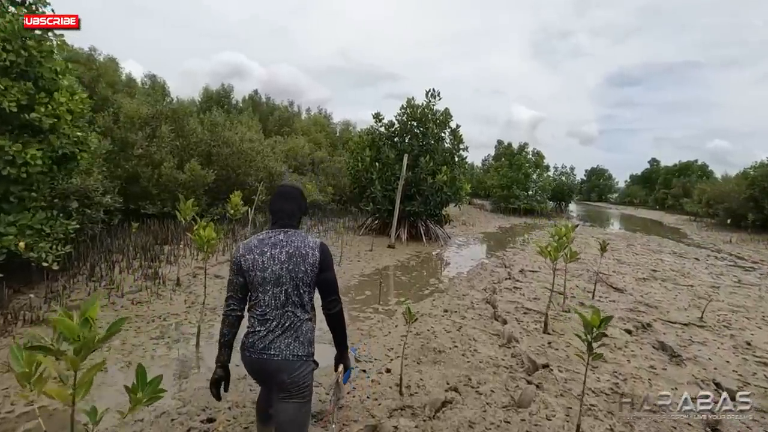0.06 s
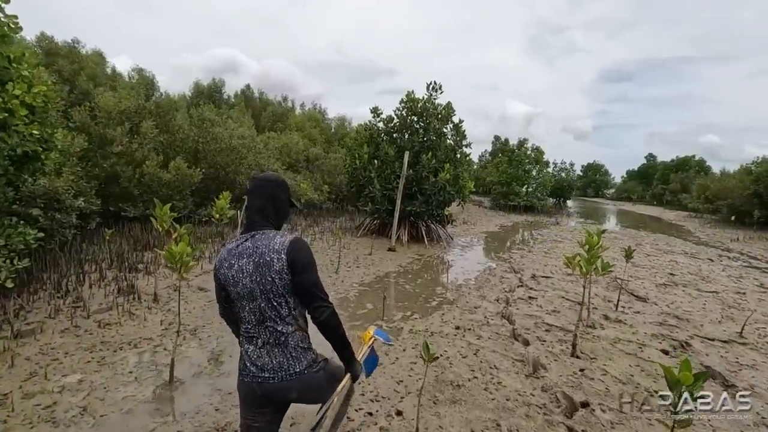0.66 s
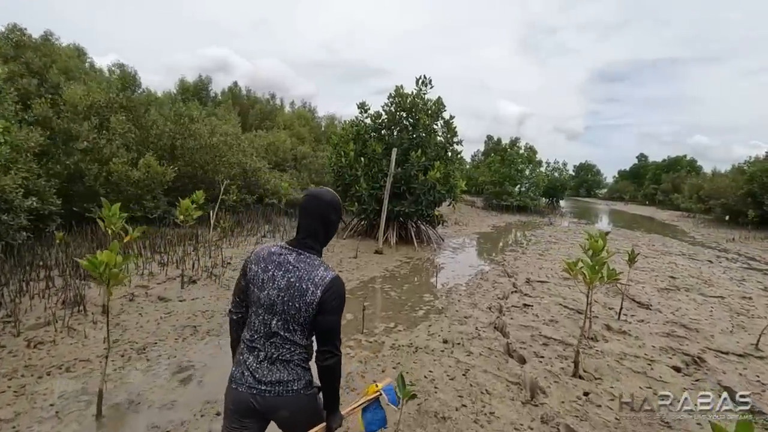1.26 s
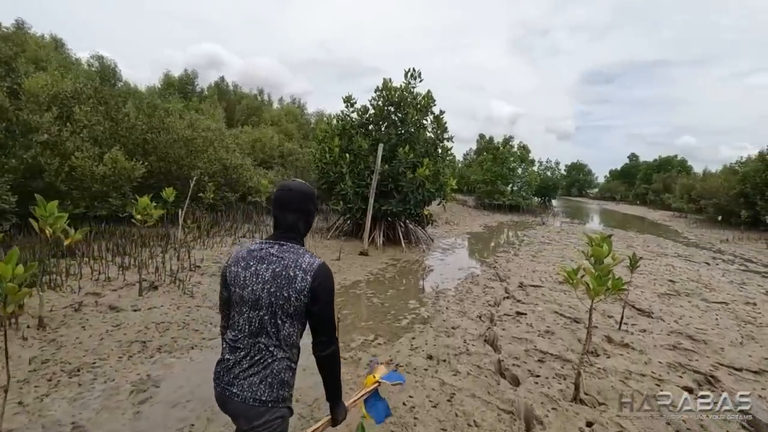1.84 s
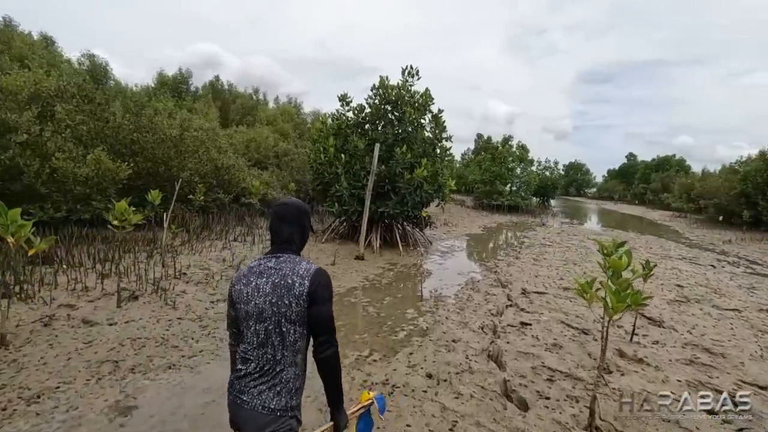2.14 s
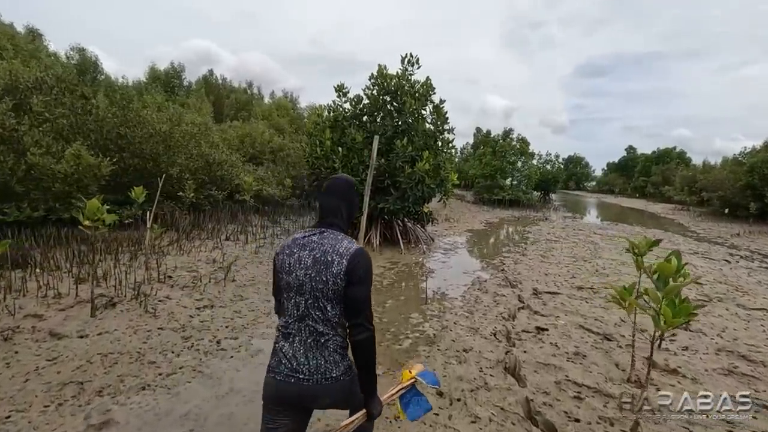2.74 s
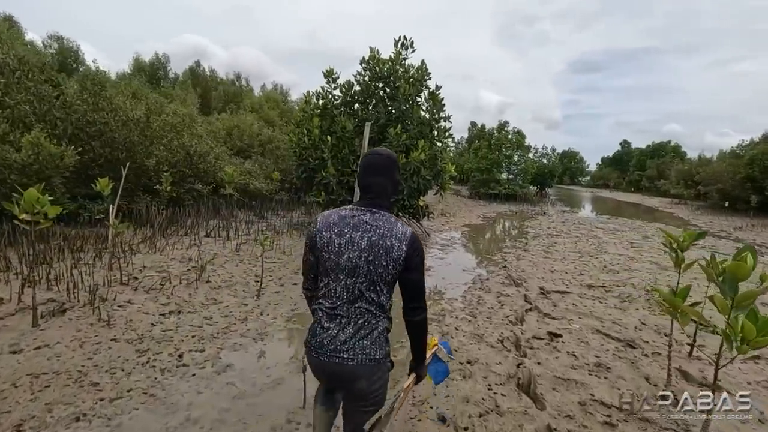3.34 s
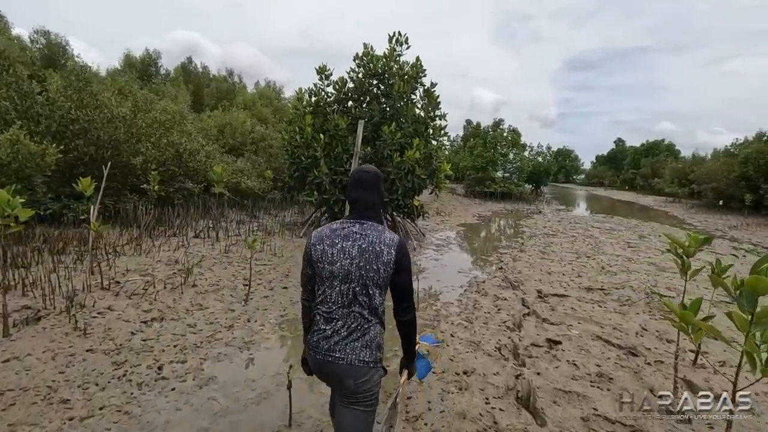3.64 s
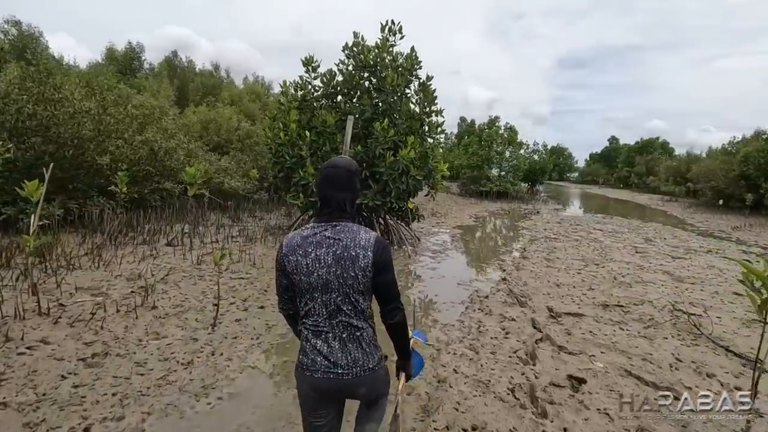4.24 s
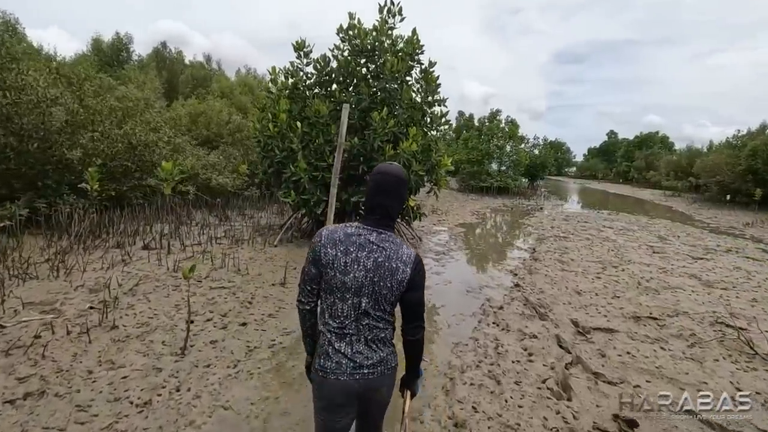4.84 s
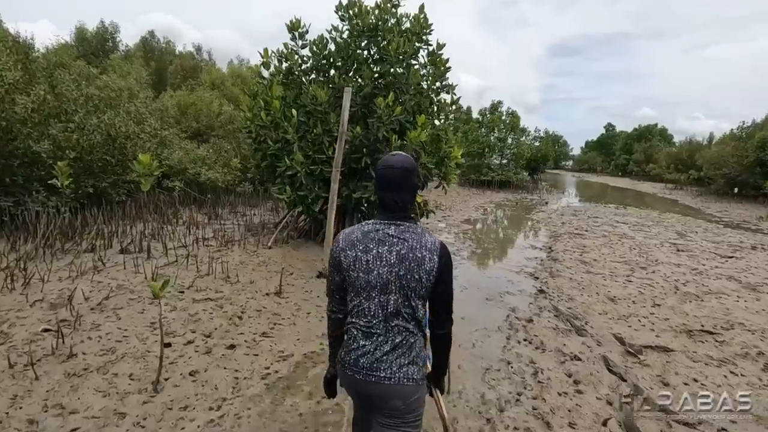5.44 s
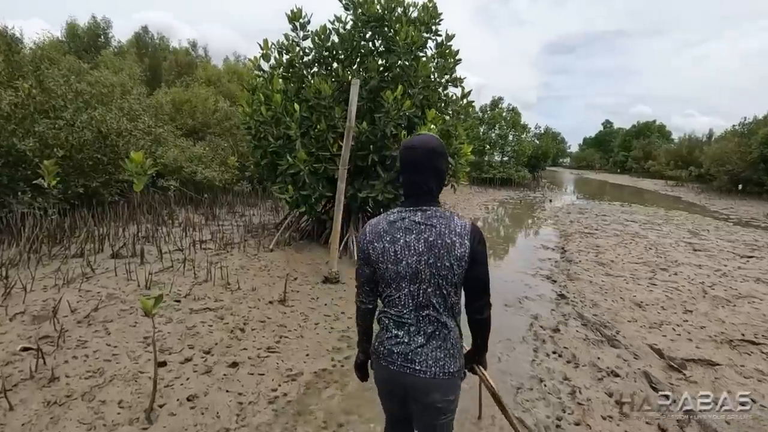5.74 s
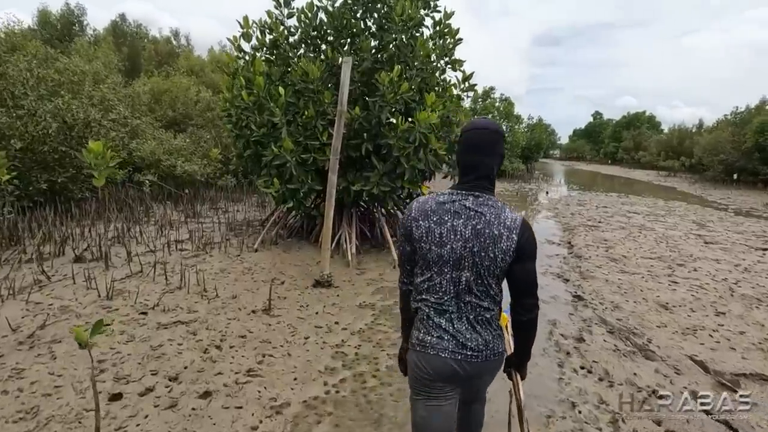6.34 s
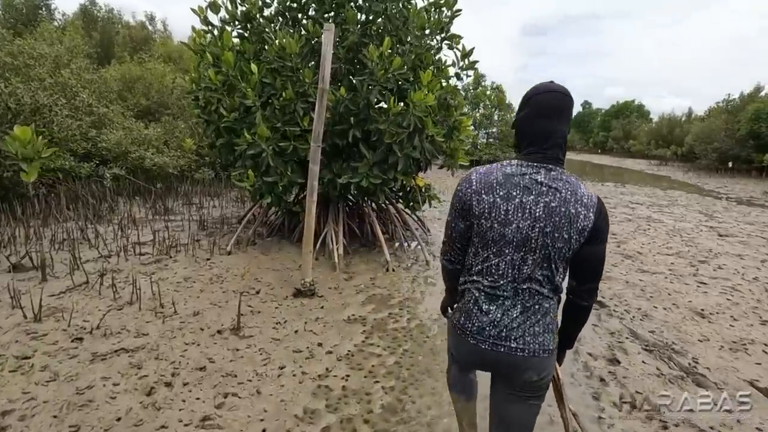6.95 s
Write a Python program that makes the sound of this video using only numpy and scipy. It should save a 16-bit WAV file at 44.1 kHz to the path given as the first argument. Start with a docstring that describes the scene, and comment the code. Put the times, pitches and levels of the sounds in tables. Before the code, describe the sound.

Wet footsteps squelch close by on a mudflat, light at first, with sticky smacks, popping air pockets and small splashes. Low wind rumble runs underneath, swelling into gusts that thump dully on the microphone, mostly on the right. As the wind eases, the wading turns heavier, with thick sloshing and glugs as water fills the footprints. The sound starts wide and a little to the left, then narrows to the centre.

```python
"""Someone wades over a tidal mudflat, just ahead of a hand-held stereo microphone.
Each foot presses out a spurt of watery mud, then drags free in a swelling slosh:
wet films burst in smacks, air pockets plop and gurgle. Behind it lies the faint hiss of the open flat.
Wind rumbles on the microphone and gusts buffet its right port.
Near the end the stereo image closes to mono, all but the top of the treble."""
import sys
import numpy as np
from scipy import signal
from scipy.fft import rfft, irfft, next_fast_len
from scipy.io import wavfile
from scipy.ndimage import uniform_filter1d, map_coordinates

SR = 44100
rng = np.random.default_rng(int(sys.argv[2]) if len(sys.argv) > 2 else 0)


def to_wav(s):
    """Save 16-bit WAV."""
    ch = np.atleast_2d(s).T  # columns
    pcm = np.round(np.clip(ch, -1, 1) * 32767)  # PCM
    wavfile.write(sys.argv[1], SR, pcm.astype(np.int16))


N = 312669

# The colour of fine wet hiss. Each row: frequency in Hz, spectral level in dB.
WET_HISS = [(200, -7), (700, -6.5), (1200, 9.5), (1700, -5.5), (3000, 5.5), (6000, -4.5), (9000, -8),
            (15000, -8)]
# The stirred puddle between steps; deeper water is louder and fizzes less.
# Each row: time in seconds, wash level in dB, fizz offset in dB.
PUDDLE_WASH = [(0, -57, 7.5), (.9, -58, 2), (1.8, -49.5, -1), (2.4, -42, -2.5), (2.85, -50.5, 7.5),
               (3.2, -41, -5.5), (3.4, -46.5, -7), (3.6, -44.5, -11), (3.68, -50, 0.5), (4.0, -41.5, -3.5),
               (4.35, -45.5, 4), (4.385, -52, 6), (4.44, -60, -2.5), (4.57, -48, 0), (4.67, -43, -6),
               (4.8, -32, -1.5), (5.3, -41, -4), (5.5, -40, -15.5), (6.1, -34.5, -16.5), (6.65, -37, -19),
               (7.0, -36.5, -14.5), (7.09, -31, -9)]
PRESS_ATTACK_S = 0.005


def amp(db):
    """Decibels to gain."""
    return 10 ** (np.asarray(db) / 20)


def unit(x):
    """x at rms 1."""
    return x / np.sqrt(np.mean(x ** 2) + 1e-20)


def along(points, hz):
    """Read (Hz, value) points on a log frequency axis."""
    knots_hz, values = np.transpose(points)
    return np.interp(np.log(hz + 1), np.log(knots_hz + 1), values)


def curves(rows):
    """One value per sample for each column after the time."""
    s, *columns = np.transpose(rows)
    return [np.interp(np.arange(N) / SR, s, column) for column in columns]


def wobble(rate, size=N):
    """A smooth random curve, rate knots a second."""
    knots = rng.standard_normal(int(size * rate / SR) + 4)
    return map_coordinates(knots, [np.arange(size) * rate / SR])


def filtered(x, response):
    """x shaped by a gain that depends on frequency."""
    size = next_fast_len(N + SR // 2)
    return irfft(rfft(x, size) * response(np.fft.rfftfreq(size, 1 / SR)), size)[..., :N]


def coloured(x, spectrum):
    """x shaped by (Hz, dB) points."""
    return filtered(x, lambda hz: amp(along(spectrum, hz)))


def noise(spectrum):
    """Noise of rms 1 with the given colour."""
    return unit(coloured(rng.standard_normal(N), spectrum))


def add(track, s, sound):
    """Mix a sound into the track at time s."""
    part = track[max(round(s * SR), 0):][:len(sound)]
    part += sound[:len(part)]


def swell(s, db, rise_s, hold_s, fall_s, shape=1.66):
    """Power that grows until time s, holds and dies away; a shape above 1 lingers and then drops."""
    t = np.arange(N) / SR - s
    outside = np.maximum(-t, 0) / rise_s + np.maximum(t - hold_s, 0) / fall_s
    return np.where(outside < 6, amp(db) ** 2 * np.exp(-2 * outside ** shape), 0)


def bubbles(starts, hz, gain, cycles, rise, size, onset=0.49):
    """Tiny cavities: each swells over onset cycles, is damped by mud and rises in pitch as it closes."""
    turns = np.arange(size) / SR * hz[:, None]
    life = np.reshape(cycles, (-1, 1))
    age = turns / life
    phase = 2 * np.pi * life * (age + rise * (age - 1 + np.exp(-age)))
    envelope = (1 - np.exp(-turns / onset)) ** 2 * np.exp(-np.sqrt(2) * age)
    end_fade = np.minimum(np.linspace(10, 0, size), 1)
    waves = gain[:, None] * envelope * end_fade * np.sin(phase)
    samples = (starts * SR).astype(int)[:, None] + np.arange(size)
    return np.bincount(samples.ravel(), waves.ravel())


def pitches(centre_hz, spread, count):
    """Cavity pitches in a bell curve on a log axis, in random order."""
    rank = (rng.permutation(count) + rng.uniform(.1, .9, count)) / count
    deviation = np.log(rank / (1 - rank)) / np.sqrt(np.pi)
    return np.minimum(centre_hz * np.exp(spread * deviation), SR / 3)


def froth(per_s, centre_hz, spread, cycles, uneven_db, size):
    """A stream of bubbles of uneven sizes, its level partly evened out over each tenth of a second."""
    count = int(per_s * N / SR)
    tone = pitches(centre_hz, spread, count)
    sizes = amp(uneven_db * np.minimum(rng.exponential(size=count), 4)) * np.sqrt(tone)
    stream = bubbles(rng.random(count) * N / SR, tone, sizes, cycles, rise=0.079, size=size)
    stream = unit(np.pad(stream, (0, N))[:N])
    local_power = np.abs(uniform_filter1d(stream ** 2, SR // 10))
    return stream / np.sqrt(local_power + 0.25)


def strays(power, per_s, level_db, uneven_db, centre_hz, spread, length_s):
    """Rows (s, dB, Hz, length s) of small random events that follow the power of the motion."""
    count = int(per_s * N / SR)
    jitter, size, tone, span = rng.uniform(-1.1, 1, (count, 4)).T
    s = (np.arange(count) + .5 + jitter / 2) / count * (N - 1) / SR
    db = 10 * np.log10(power[(s * SR).astype(int)] + 1e-20) + level_db + uneven_db * size
    return list(zip(s, db, centre_hz * np.exp(spread * tone), length_s * 2 ** span))


def open_air():
    """The faint, even hiss of the open flat."""
    return amp(-62) * noise(WET_HISS)


def eddy_knocks():
    """A strong eddy striking the microphone gives a short, dull, rounded pressure swing."""
    # Each row: time in seconds, level in dB.
    strikes = [(4.876, -9.5), (4.985, -15), (5.01, -5.5), (5.023, -2.5), (5.032, -3.5), (5.075, -9),
               (5.136, -6), (5.162, -4.5), (5.192, -8.5), (5.287, -6), (5.332, -13)]
    out = np.zeros(N)
    for s, db in strikes:
        hz = np.array([125, 300]) * np.exp(0.15 * rng.standard_normal(2))
        swing = bubbles(np.zeros(2), hz, np.array([1, 0.72]), cycles=.8, rise=0, size=2000, onset=1)
        add(out, s - .003, amp(db - 6) * swing / np.abs(swing).max())
    return out


def wind(width, calm_db=-44, lean_per_db=0.52):
    """Eddies hit both microphone ports, partly alike; the stronger a gust, the more it leans right."""
    # The breeze on the microphone. Each row: time in seconds, rumble level in dB.
    breeze = [(0.0, -29.5), (0.93, -35.5), (2.09, -26.5), (2.8, -36.5), (3.04, -28), (3.75, -34),
              (3.93, -22), (4.84, -25), (4.88, -18.5), (5.43, -32), (5.45, -39.5), (6.57, -38.5),
              (7.09, -49)]
    # Gusts on the right port. Each row: time of full strength in seconds, level in dB, hold in seconds.
    gusts = [(4.032, -31, 0.1), (4.494, -39.5, 0.62), (5.02, -24, 0.13), (5.282, -28.5, 0.026)]
    # The colours of the deep rumble and the buffeting. Each row: frequency in Hz, spectral level in dB.
    rumble_colour = [(5, 3.5), (14, 4), (30, 4), (55, -3), (100, -14.5), (160, -19.5), (400, -50),
                     (1000, -120)]
    buffet_colour = [(45, -3.5), (85, 2), (130, 3), (200, -1), (280, -5.5), (450, -10), (900, -32),
                     (3000, -64)]

    def eddies(colour, unlike):
        """Turbulence common to both ports, plus a part in opposite phase."""
        return noise(colour) + unlike * width * np.array([[1], [-1]]) * noise(colour)

    rumble = amp(curves(breeze)[0] + 1) * eddies(rumble_colour, unlike=0.35)
    gust_power = sum(swell(s, db, 0.046, hold_s, fall_s=0.077) for s, db, hold_s in gusts)
    power = gust_power + amp(calm_db) ** 2
    flutter = unit(amp((2.5 + gust_power / power) * wobble(45)))
    buffet = np.sqrt(power) * flutter * eddies(buffet_colour, unlike=0.25)
    lean_db = lean_per_db * (10 * np.log10(power) - calm_db)
    ports = amp([-lean_db / 2, lean_db / 2])
    return (rumble + buffet + eddy_knocks()) * ports / ports.mean(0)


def echo(x, t60_s=0.088):
    """A short diffuse answer from close by; it keeps changing as walker and microphone move."""
    hop = SR // 10
    t = np.arange(hop) / SR
    pieces = np.lib.stride_tricks.sliding_window_view(np.pad(x, (0, 2 * hop)), 2 * hop)[::hop]
    tails = rng.standard_normal((len(pieces), hop)) * amp(-60 * t / t60_s)
    tails /= np.linalg.norm(tails, axis=1, keepdims=True)
    answers = signal.fftconvolve(pieces * np.sqrt(np.hanning(2 * hop)), tails, axes=1)
    out = np.zeros(N)
    for k, answer in enumerate(answers):
        add(out, k * hop / SR, answer)
    return out


def stereo_image(x, width, bounce_db=-11):
    """The ground and the walker's body scatter the sound differently to each port, treble most."""
    # Where the feet are, seen from the microphone. Each row: time in seconds, leftward lean in dB.
    bearing = [(0, 5), (1.6, 6), (2.7, 6.5), (3.6, 2), (4.4, 5), (5.4, 2)]
    # The right port is duller at the very top. Each row: frequency in Hz, leftward lean in dB.
    shade = [(8000, -1.5), (12000, 3)]
    # Scattered sound that differs between the ports. Each row: frequency in Hz, level in dB.
    scatter = [(300, -20), (900, -6), (2500, -7), (6000, -8.5), (9000, -6.5), (12000, -1.5)]
    # The width left when the rest closes to mono. Each row: frequency in Hz, side gain in dB.
    stays_wide = [(3000, -57), (6000, -15), (8500, -21), (10500, -0.5)]

    def lean(db):
        """Side gain for a left-minus-right difference in dB."""
        return np.tanh(np.log(amp(db)) / 2)

    mid = x + amp(bounce_db) * echo(x)
    side = lean(curves(bearing)[0]) * mid + filtered(mid, lambda hz: lean(along(shade, hz)))
    side += coloured(echo(x), scatter)
    side = width * side + (1 - width) * coloured(side, stays_wide)
    return np.array([mid + side, mid - side])


def spray():
    """Tiny droplets flung up by a flat-footed step patter down brightly."""
    # Each row: start in seconds, level in dB, ebb time in seconds.
    showers = [(1.884, -33.5, 0.067), (2.672, -42, 0.067), (2.776, -39, 0.085), (4.445, -40, 0.12)]
    power = sum(swell(s, db, PRESS_ATTACK_S, 0, ebb_s) for s, db, ebb_s in showers)
    droplets = froth(per_s=1400, centre_hz=7600, spread=.3, cycles=4, uneven_db=2.5, size=120)
    return np.sqrt(power) * droplets


def squirts(sputter_db=4.5):
    """Mud and air hiss through a resonance that climbs as the gap narrows."""
    # Each row: start in seconds, level in dB, first and last pitch in Hz, length in seconds,
    # half bandwidth as a fraction of the first pitch.
    gaps = [(2.874, -42.5, 1960, 2780, 0.1, 0.13), (2.96, -41, 5090, 5650, 0.09, 0.38),
            (2.959, -44.5, 2690, 3410, 0.11, 0.2), (3.08, -33, 634, 1740, 0.024, 0.22),
            (3.105, -36.5, 1775, 2800, 0.025, .16), (4.339, -39, 1274, 1750, 0.025, 0.22),
            (6.456, -36, 1013, 1444, 0.056, 0.2)]
    out = np.zeros(N)
    for s, db, start_hz, end_hz, length, half_band in gaps:
        progress = np.linspace(0, 1, int(length * SR))
        size = len(progress)
        white = rng.standard_normal(size) + 1j * rng.standard_normal(size)
        flutter = signal.lfilter(*signal.butter(2, half_band * start_hz, fs=SR), white)
        sputter = amp(sputter_db * wobble(220, size))
        waver = np.exp(.03 * wobble(160, size))
        hz = (start_hz + (end_hz - start_hz) * progress) * waver
        hiss = (flutter * np.exp(2j * np.pi * np.cumsum(hz) / SR)).real
        envelope = np.sqrt(np.abs(np.sin(np.pi * progress)))
        add(out, s, amp(db) * envelope * unit(sputter * hiss))
    return out


def glugs():
    """Water fills a footprint: the shrinking cavity sings upward, quickly at first, and flutters."""
    # Each row: start in seconds, level in dB, first and last pitch in Hz, length in seconds.
    cavities = [(1.509, -20.5, 108, 198, 0.028), (2.962, -37, 520, 676, 0.05),
                (4.249, -24.5, 132, 331, 0.103), (5.918, -22, 179, 295, 0.04),
                (6.786, -24, 260, 316, 0.017), (6.895, -34.5, 410, 617, 0.051)]
    out = np.zeros(N)
    for s, db, start_hz, end_hz, length in cavities:
        progress = np.linspace(0, 1, int(length * SR))
        hz = start_hz + (end_hz - start_hz) * np.sin(progress * np.pi / 2)
        flutter = 1 + .18 * wobble(260, len(progress))
        envelope = np.sin(np.pi * progress ** .7) ** 2
        add(out, s, amp(db) * envelope * flutter * np.sin(2 * np.pi * np.cumsum(hz) / SR))
    return out


def gurgles_and_buffet(pulses_per_s=900, uneven_db=3):
    """Crowded, strongly damped pulses merge into a thick gurgle or a low, dull buffet."""
    # Air drawn under a foot, except at 5.116 s: wind buffeting the microphone during the gust.
    # Each row: start in seconds, level in dB, centre pitch in Hz, length in seconds.
    churns = [(1.265, -47.5, 700, 0.053), (1.488, -35, 1770, 0.036), (2.126, -41.5, 924, 0.1),
              (2.265, -37, 474, 0.032), (3.11, -40.5, 604, 0.053), (3.837, -47, 990, 0.097),
              (4.041, -41, 557, .06), (4.454, -35, 1900, 0.042), (4.52, -34, 2030, .065),
              (4.848, -33, 1700, .03), (5.116, -27, 518, .05), (5.781, -32.5, 757, 0.031),
              (5.865, -36, 485, .09), (6.01, -40, 563, 0.064), (6.55, -30, 766, .014),
              (6.653, -34, 760, .012), (6.75, -37.5, 400, 0.088)]
    out = np.zeros(N)
    for s, db, hz, length in churns:
        count = 6 + int(pulses_per_s * length)
        place = (np.arange(count) + rng.random(count)) / count
        tone = pitches(hz, spread=0.504, count=count)
        sizes = amp(uneven_db * rng.standard_normal(count)) * np.sqrt(tone * np.sin(np.pi * place))
        sizes *= rng.choice([-1, 1], count)
        churn = bubbles(place * length, tone, sizes, cycles=1.8, rise=0.11, size=1800)
        add(out, s, amp(db) * np.sqrt(length * SR) * churn / np.linalg.norm(churn))
    return out


def plops_and_knock(pull, rise=0.11, small_gain=0.29):
    """A brief ring with smaller pulses around it makes a plop or a short, dull knock."""
    # Air pockets popping in the mud, except at 5.16 s: a wind eddy knocking on the microphone.
    # Each row: start in seconds, level in dB, pitch in Hz, length in seconds.
    rings = [(0.259, -30.5, 4580, 0.007), (0.385, -31.5, 428, 0.0066), (0.484, -34, 1280, 0.01),
             (1.219, -39.5, 590, 0.013), (1.305, -33, 320, 0.017), (1.484, -35, 346, 0.02),
             (1.511, -31.5, 410, 0.008), (1.616, -31.5, 3220, 0.0054), (2.14, -33.5, 281, 0.018),
             (2.174, -32.5, 1130, 0.0054), (2.274, -30, 325, 0.011), (2.841, -26.5, 1440, 0.0071),
             (3.175, -23, 1100, 0.0059), (3.18, -30, 470, 0.011), (3.519, -40, 485, 0.026),
             (3.625, -25.5, 547, 0.0055), (3.774, -32.5, 1190, 0.012), (3.892, -28.5, 805, 0.01),
             (4.75, -21, 1260, 0.0042), (4.779, -31, 745, 0.0098), (4.795, -28, 410, 0.0051),
             (5.064, -25.5, 903, 0.021), (5.074, -21, 493, 0.0082), (5.16, -24, 560, .007),
             (5.616, -27, 900, 0.0067), (5.792, -28, 485, 0.011), (5.824, -25.5, 765, .014),
             (5.856, -27.5, 724, .009), (5.877, -25.5, 805, 0.0089), (5.955, -27, 395, 0.0079),
             (6.23, -36, 920, 0.0067), (6.285, -31, 497, 0.014), (6.375, -34, 720, 0.0075),
             (6.459, -34.5, 1000, 0.012), (6.535, -22.5, 1030, 0.0053), (6.618, -33, 780, 0.0065),
             (6.735, -31.5, 905, 0.0073), (6.682, -23.5, 830, 0.0062), (6.785, -27, 607, 0.02),
             (6.822, -31, 850, .012), (6.857, -24.5, 785, 0.0082), (7.062, -33, 830, 0.0045)]
    lesser = strays(pull, per_s=17, level_db=-8.5, uneven_db=5, centre_hz=628, spread=0.486,
                    length_s=0.016)
    out = np.zeros(N)
    for s, db, hz, length in rings + lesser:
        start_hz = np.array([hz / (1 + rise / 2)])
        cycles = max(0.57 * hz * length, 1.2)
        ring = bubbles(np.zeros(1), start_hz, np.ones(1), cycles, rise, size=3000, onset=0.82)
        starts = length * rng.random(6)
        small_hz = pitches(hz * 1.385, spread=0.39, count=6)
        small = bubbles(starts, small_hz, np.ones(6), cycles=0.81, rise=rise, size=1500)
        level = amp(db) * np.sqrt(length * SR / (1 + small_gain ** 2))
        add(out, s, level * ring / np.linalg.norm(ring))
        add(out, s, level * small_gain * small / np.linalg.norm(small))
    return out


def pops(tail_db=-15, tail_s=0.0057, roughness=0.28):
    """A thick bubble's skin opens over a few cycles; it rings unsteadily and leaves a short wet tail."""
    # Each row: start in seconds, level in dB, pitch in Hz, swell time in seconds.
    bursts = [(1.8968, -6.5, 2610, 0.00024), (1.9063, -14.5, 4860, .0005), (1.9543, -11.5, 3950, 0.00033),
              (1.9709, -25, 4600, 0.00025), (2.8491, -10.5, 3580, 0.00071), (3.6241, -8, 3970, 0.00038),
              (3.939, -16.5, 5700, .0005), (4.0982, -13, 2350, 0.00032), (4.7553, -10, 5040, 0.00044),
              (4.7938, -10.5, 2210, 0.00074), (5.9165, -11.5, 2960, 0.001), (5.938, -11, 3920, 0.00063)]
    out = np.zeros(N)
    t = np.arange(SR // 40) / SR
    for s, db, hz, swell_s in bursts:
        age = t / swell_s
        opening = age ** 2 * np.exp(2 - 2 * age)
        tail = amp(tail_db) * (1 - np.exp(-age)) * np.exp(-t / tail_s)
        pitch = hz * np.exp(roughness * wobble(hz, len(t)))
        add(out, s, amp(db) * (opening + tail) * np.sin(2 * np.pi * np.cumsum(pitch) / SR))
    return out


def smacks(motion, films_per_s=1100, uneven_db=4, spit_gain=0.3, ring_gain=0.35):
    """Mud tears underfoot in a quick run of bursting films, with a spit of spray and a faint ring."""
    # The loudest tears. Each row: start in seconds, level in dB, centre pitch in Hz, length in seconds.
    tears = [(0.017, -27, 3880, 0.0075), (0.115, -38.5, 5330, 0.004), (0.257, -30.5, 4740, 0.0052),
             (0.379, -37.5, 4430, 0.0051), (0.432, -28, 2900, 0.0021), (0.973, -38.5, 5100, 0.013),
             (1.036, -35, 4460, 0.011), (1.18, -36, 4450, 0.0021), (1.29, -34, 3670, 0.011),
             (1.309, -30, 3370, 0.005), (1.382, -37, 3700, 0.0032), (1.487, -34, 2440, 0.019),
             (1.622, -28.5, 3440, 0.0026), (1.87, -28.5, 2300, 0.0022), (1.885, -20.5, 3860, 0.0052),
             (1.893, -22, 2400, 0.015), (2.041, -32.5, 4260, 0.0062), (2.244, -35.5, 1840, 0.015),
             (2.678, -33, 4750, 0.0053), (2.78, -27.5, 3000, 0.01), (2.797, -29.5, 3930, 0.0038),
             (2.838, -22, 2700, 0.0036), (3.11, -28, 1720, 0.0031), (3.134, -27, 2900, .009),
             (3.145, -31, 4170, 0.0062), (3.45, -28.5, 4720, 0.0042), (3.503, -28.5, 3700, 0.0014),
             (3.64, -29, 2110, 0.016), (3.772, -31.5, 2100, .007), (4.007, -33, 5300, 0.011),
             (4.093, -27, 2580, 0.003), (4.445, -29, 4530, .005), (4.455, -25.5, 3580, 0.014),
             (4.71, -32.5, 2610, 0.0089), (4.749, -20, 2970, 0.0052), (4.763, -21.5, 4330, 0.0047),
             (4.927, -30, 1900, 0.013), (5.108, -15, 1574, 0.0055), (5.114, -20.5, 3560, 0.0045),
             (5.355, -31, 2430, 0.018), (5.577, -31, 2990, 0.034), (5.954, -32, 2140, 0.0091),
             (6.283, -24.5, 1620, 0.0057), (6.368, -26, 2290, 0.011), (6.554, -35.5, 2000, .008),
             (6.87, -20, 2080, 0.009), (7.041, -27, 5100, 0.0027)]
    lesser = strays(motion, per_s=6, level_db=2, uneven_db=2, centre_hz=3045, spread=0.325, length_s=.008)
    out = np.zeros(N)
    for s, db, hz, length in tears + lesser:
        count = 6 + int(films_per_s * length)
        place = (np.arange(count) + rng.random(count)) / count
        tone = pitches(hz, spread=0.526, count=count)
        arch = np.sin(np.pi * np.sqrt(place))
        sizes = amp(uneven_db * rng.standard_normal(count)) * np.sqrt(tone * arch)
        sizes *= rng.choice([-1, 1], count)
        burst = bubbles(place * length, tone, sizes, cycles=1.62, rise=0.15, size=600, onset=.8)
        burst += spit_gain * uniform_filter1d(np.abs(burst), 60) * rng.standard_normal(len(burst))
        ring_hz = hz * np.exp([0, .3 * rng.standard_normal() - .2])
        ring_starts = length * rng.random(2)
        ring = bubbles(ring_starts, ring_hz, np.ones(2), cycles=12, rise=.03, size=1400, onset=1)
        level = amp(db) * np.sqrt(length * SR / (1 + ring_gain ** 2))
        add(out, s, level * burst / np.linalg.norm(burst))
        add(out, s, level * ring_gain * ring / np.linalg.norm(ring))
    return out


def spurts(per_s=45, life_s=0.0087, share=0.76):
    """The mud yields in fits that start at once and die away: a gain with mean square 1."""
    kicks = (rng.random(N) < per_s / SR) * rng.exponential(size=N)
    power = signal.lfilter([1], [1, -np.exp(-1 / (life_s * SR))], kicks)
    return np.sqrt(1 - share + share * power / power.mean())


def mud_flow(press, pull, puddle, puddle_fizz_db):
    """Mud squeezed by the feet: low slosh, squish, ringing blips, fizz, sticky ticks and seeping water."""
    slosh = froth(per_s=280, centre_hz=640, spread=0.4, cycles=2.8, uneven_db=3.5, size=850)
    squish = froth(per_s=750, centre_hz=2480, spread=0.36, cycles=6, uneven_db=1.2, size=420)
    blips = froth(per_s=140, centre_hz=1600, spread=.33, cycles=9, uneven_db=3.5, size=1000)
    fizz = froth(per_s=650, centre_hz=5300, spread=0.28, cycles=6, uneven_db=3.5, size=180)
    ticks = froth(per_s=60, centre_hz=3600, spread=.3, cycles=9, uneven_db=4.5, size=480)
    seep = noise(WET_HISS)
    power = press + pull + puddle
    sloshing = press * amp(-24) ** 2 + pull * amp(-1) ** 2 + puddle * amp(-8) ** 2  # pulls slosh most
    slosh_db = 10 * np.log10(sloshing / power)
    fizz_db = puddle_fizz_db + 3.5 * pull / power
    ticks *= np.sqrt(1 - puddle / power / 2)  # softer between steps
    spurting = amp(slosh_db - 2.5) * slosh + amp(-6.5) * squish + amp(fizz_db - 7) * fizz
    steady = amp(-9.5) * blips + amp(fizz_db - 7.5) * ticks + amp(0.3 * fizz_db - 5.5) * seep
    return np.sqrt(power) * (spurts() * spurting + steady)


def wading():
    """Close to the microphone, feet press into the mud, drag free and keep the puddle stirred."""
    # A foot presses down: water spurts out at once, then ebbs.
    # Each row: start in seconds, level in dB, ebb time in seconds.
    presses = [(0.0, -41.5, 0.046), (0.204, -47.5, 0.38), (0.58, -52, 0.24), (0.982, -47.5, 1),
               (1.291, -42, 0.35), (1.883, -32, 0.082), (2.03, -54, 0.065), (2.671, -45, 0.11),
               (2.772, -42.5, 0.1), (3.623, -26.5, 0.051), (3.99, -42, 0.15), (4.451, -32.5, 0.12),
               (4.752, -39, 0.16), (5.274, -35, 0.11), (5.351, -27.5, 0.077), (5.534, -30, 0.036),
               (5.59, -31, 0.13), (6.287, -34.5, 0.22), (7.035, -51, 0.14)]
    # A foot drags free: the slosh swells until the mud lets go.
    # Each row: moment of release in seconds, level in dB, swell time in seconds.
    pulls = [(0.40, -55, 0.1), (1.51, -42.5, 0.22), (2.27, -47, 0.13), (3.15, -40.5, 0.058),
             (3.92, -37.5, 0.14), (5.128, -36, 0.11), (5.93, -30, 0.11), (6.57, -34, 0.043),
             (6.79, -30.5, 0.094)]
    press = sum(swell(s, db, PRESS_ATTACK_S, 0, ebb_s) for s, db, ebb_s in presses)
    pull = sum(swell(s, db, swell_s, 0, fall_s=0.073) for s, db, swell_s in pulls)
    wash_db, fizz_db = curves(PUDDLE_WASH)
    puddle = amp(wash_db) ** 2
    shallow = amp(np.minimum(fizz_db, 0))  # films tear less under deep water
    events = smacks(shallow * (press + pull + puddle)) + pops() + plops_and_knock(pull)
    events += gurgles_and_buffet() + glugs() + squirts() + spray()
    return events + mud_flow(press, pull, puddle, fizz_db)


def scene():
    """Steps in the mud just ahead and a little to the left, open air, and wind on the microphone."""
    # The image closing towards mono. Each row: time in seconds, stereo width from 0 to 1.
    narrowing = [(4.2, 1), (4.6, .75), (5.35, .6), (5.6, .1), (6.0, 0)]
    width, = curves(narrowing)
    return stereo_image(wading() + open_air(), width) + wind(width)


def record(dry, top_hz=15800):
    """The microphone dulls the treble, with a resonance near the top; it clips and is band-limited."""
    # The response of its ports. Each row: frequency in Hz, gain in dB.
    response = [(1000, 2.5), (4000, 0.5), (5600, 2.5), (8200, 0.5), (10800, -9.5), (12200, -4),
                (13500, -16.5), (15500, -22)]
    clipped = np.clip(coloured(dry, response), -1, 1)
    return filtered(clipped, lambda hz: hz < top_hz)


dry = scene()
out = record(dry)
to_wav(out)
```